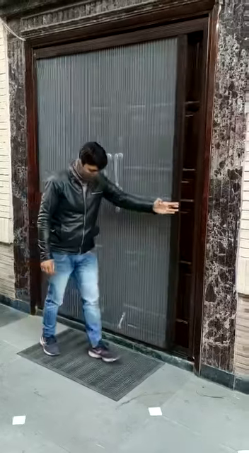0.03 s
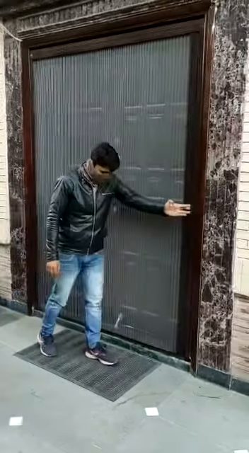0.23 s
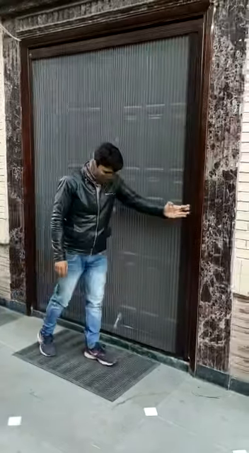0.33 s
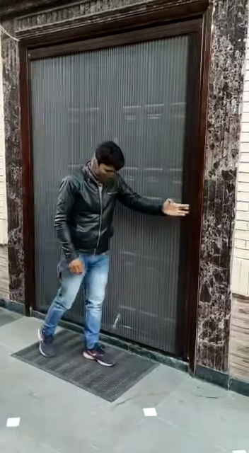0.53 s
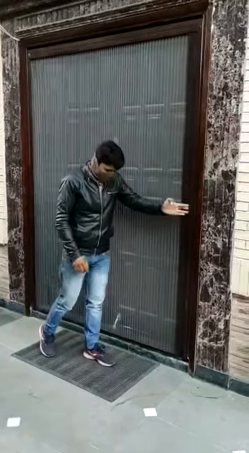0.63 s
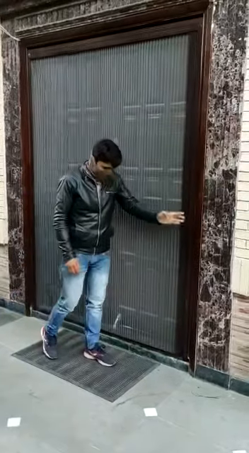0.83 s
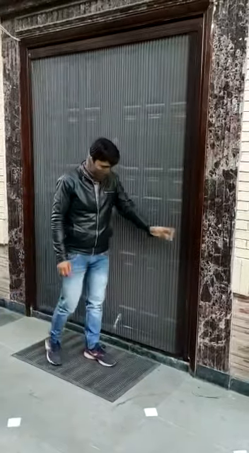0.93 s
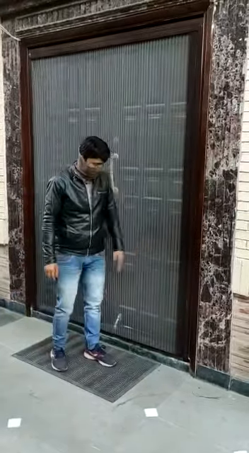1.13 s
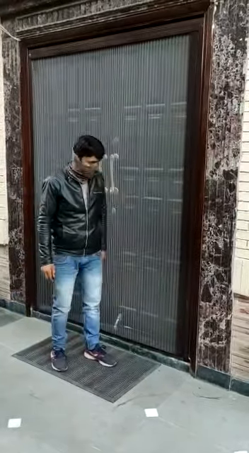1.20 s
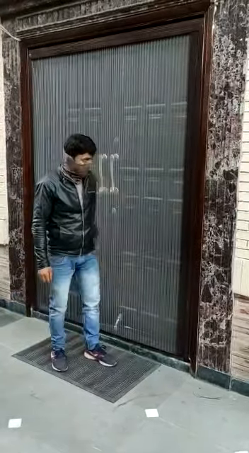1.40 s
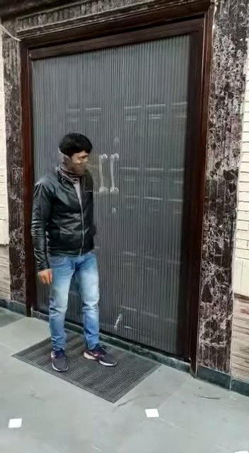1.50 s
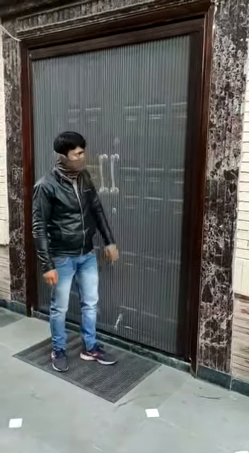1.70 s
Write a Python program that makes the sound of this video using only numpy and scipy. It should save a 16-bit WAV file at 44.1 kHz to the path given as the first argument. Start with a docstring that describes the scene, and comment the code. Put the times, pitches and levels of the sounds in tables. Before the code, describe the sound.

A pleated mesh door rushes softly along its track, then slams into its frame at about 0.25 seconds with a loud, sharp clack that rings in the stone porch for half a second. A jacket swishes faintly around 1 second and again near 1.4, while shoes settle softly on a mat at about 1.3 to 1.4. Low outdoor rumble, faint hiss and a thin electrical whine continue throughout.

```python
"""Mesh door slamming in a porch

A pleated mesh door rushes along its track, where friction excites narrow resonances. Its edge bar
strikes the frame in a quick clatter; the frame rings in damped modes and the stone porch reverberates.
A jacket then swishes as the arm drops and the body turns, and shoes settle softly on the mat.
Low outdoor rumble, faint hiss and a thin electrical whine continue throughout."""
import sys
import numpy as np
from scipy import signal
from scipy.fft import rfft, irfft
from scipy.io import wavfile

SR = 44100
rng = np.random.default_rng(int(sys.argv[2]) if len(sys.argv) > 2 else 0)


def log_audio(samples):
    """Write samples as a 16-bit WAV file to the path given in sys.argv[1]."""
    # one column per channel
    frames = np.atleast_2d(samples).T
    # limit to full scale, then quantise
    limited = np.clip(frames, -1, 1)
    pcm = np.round(limited * 32767).astype(np.int16)
    wavfile.write(sys.argv[1], SR, pcm)


N = 77175
TIME = np.arange(N) / SR
BIN_HZ, PADDED_BIN_HZ = np.fft.rfftfreq(N, 1 / SR), np.fft.rfftfreq(2 * N, 1 / SR)
DOOR_STOP_S = 0.26

# Coherence of the left and right channels: f/Hz, correlation
COHERENCE = [(100, .96), (330, 0.92), (700, 0.68), (1400, 0.0038), (2800, 0.023), (12000, -0.26)]
# Excess of the left channel over the right: f/Hz, level/dB
LEFT_EXCESS = [(100, 1.5), (400, 1.5), (1200, 2.5), (2400, 2), (4400, 4.5), (7000, 10), (9500, 11.5),
               (12000, 5.5), (15000, -1.5)]
# Envelope of the sliding mesh: t/s, level/dB
SLIDE_ENVELOPE = [(0, -43.5), (.04, -42.5), (.08, -44), (.12, -44), (.17, -45.5), (.24, -44.5)]
# Spectrum of pleats and runners rubbing: f/Hz, relative level/dB
SLIDE_SPECTRUM = [(200, -8.5), (600, -12.5), (1150, -5), (1450, -4.5), (2050, 1), (2750, -4), (3400, -3),
                  (4500, -6.5), (6200, -9.5), (10000, -8.5), (12500, -16.5), (16000, -19)]
# Resonances of the track: f/Hz, glide/(Hz/s), bandwidth/Hz, level/dB, peak t/s, spread/s
TRACK_RESONANCES = [(1400, -2000, 100, -51, 0.12, 0.069), (2196, 8, 130, -50.5, 0.1, 0.096),
                    (1900, 2, 130, -43.5, 0.25, 0.11), (3420, -2, 390, -45, 0.112, 0.013)]
# Envelope of the outdoor rumble: t/s, level/dB
RUMBLE_ENVELOPE = [(0, -47.5), (.3, -44), (.65, -46), (.8, -45), (.93, -43.5), (1.05, -46.5), (1.25, -45.5),
                   (1.5, -48), (1.75, -48)]
# Spectra of the outdoor rumble and hiss: f/Hz, relative level/dB
RUMBLE_SPECTRUM = [(15, -6.5), (28, 3.5), (38, 0), (55, 0.5), (80, -7), (120, -9), (200, -19), (400, -24),
                   (1000, -42)]
HISS_SPECTRUM = [(100, 4), (330, -0.5), (600, -3), (1100, -4.5), (2000, -6.5), (3000, -13.5), (4000, -15),
                 (6000, -14), (10000, -20), (13000, -29), (16000, -45)]
# Harmonics of the whine: harmonic number, left level/dB, right level/dB, modulation depth
WHINE_HARMONICS = [(1, -53.5, -54, 0.013), (2, -61.5, -68, 0.28), (3, -68, -70, 0.7),
                   (4, -62.5, -68.5, 0.21), (5, -72.5, -78, 0.37), (6, -71, -79, 0.76)]
# Impacts of the edge bar on the frame: t/s, relative level/dB, low-pass corner f/Hz
BAR_IMPACTS = [(.2396, -14, 15000), (.2421, -1, 9000), (.2453, -8, 4000), (.2496, .5, 13000),
               (.2507, -4, 9000), (.2527, -3, 5000), (.2603, -11, 3000), (.2686, -8, 4000)]
# Spectrum of an impact: f/Hz, relative level/dB
IMPACT_SPECTRUM = [(100, -35), (195, -28), (235, 3), (310, 2), (400, -2), (600, -0.5), (900, -0.5),
                   (1900, 5.5), (3000, -0.5), (3900, -5.5), (6000, -11), (8500, -7.5), (10500, -8.5),
                   (12500, -20.5), (16000, -26)]
# Normal modes of bar and frame: f/Hz, relative level/dB, T60/s
NORMAL_MODES = [(232, -10, .2), (263, -8, .45), (288, -11, .4), (368, 5, .17), (447, -2, .27),
                (662, -6, .15), (864, -6, .24), (962, -9, .25), (1197, -6, .24), (1433, -7, .3),
                (1645, -7, .33), (1819, -6, .3), (1880, -8, .26), (1985, -5, .36), (2111, -8, .32),
                (2146, -7, .28), (2455, -8, .22), (2680, -9, .22), (2822, -11, .2)]
# Spectrum of the porch's reverberation: f/Hz, relative level/dB
PORCH_SPECTRUM = [(70, -11.5), (135, -1.5), (200, -11.5), (245, -1), (310, 1.5), (420, 1), (600, -3.5),
                  (1000, -5), (2000, -2), (3000, -7), (4200, -8), (6500, -10.5), (9500, -11), (12500, -13),
                  (16000, -20.5)]
# Reverberation time of the porch: f/Hz, T60/s
REVERBERATION_TIME = [(120, 1.08), (250, 0.7), (500, .57), (2000, 0.61), (5000, .42), (9000, 0.3),
                      (15000, 0.13)]
# Strokes of the sleeve: onset t/s, attack/s, hold/s, release/s, level/dB, lower f/Hz, upper f/Hz
SLEEVE_STROKES = [(0.941, 0.018, 0.022, 0.078, -52.5, 3040, 8600),
                  (0.956, 0.014, 0.029, 0.073, -50, 1400, 4400), (1.162, .01, .015, 0.045, -57, 1400, 2250),
                  (1.15, .05, 0.072, 0.084, -64, 4000, 13800),
                  (1.401, 0.0031, 0.024, 0.084, -49.5, 4500, 16000),
                  (1.424, 0.032, 0.026, 0.078, -51, 6000, 14000)]
# Shoes settling on the mat: t/s, relative level/dB, centre f/Hz, T60/s
FOOTFALLS = [(1.294, -45, 385, .12), (1.395, -45, 148, .55)]


def from_db(db):
    """The decibel scale: amplitude grows tenfold for every 20 dB."""
    return 10 ** (np.asarray(db) / 20)


def unit_rms(x):
    """Normalisation to unit mean power."""
    return x / np.sqrt(np.mean(x ** 2) + 1e-20)


def at_hz(table, hz):
    """Interpolation of a table along a logarithmic frequency axis."""
    frequencies, values = np.transpose(table)
    return np.interp(np.log(np.maximum(hz, 1)), np.log(frequencies), values)


def drift(rate):
    """Random modulation: straight lines join Gaussian values, `rate` of them a second."""
    knots = rng.standard_normal(2000)
    return np.interp(TIME * rate, np.arange(len(knots)), knots)


def decay(t60, start=0):
    """Exponential damping: from its start, the amplitude falls 60 dB in t60 seconds."""
    return (TIME >= start) * np.exp(-np.log(1000) * np.maximum(TIME - start, 0) / t60)


def colour(x, spectrum):
    """Minimum-phase filtering at unit power gain; folding the cepstrum makes it causal."""
    gain = unit_rms(from_db(at_hz(spectrum, PADDED_BIN_HZ)))
    cepstrum = irfft(np.log(gain))
    cepstrum[1:N] *= 2
    cepstrum[N + 1:] = 0
    return irfft(rfft(x, 2 * N) * np.exp(rfft(cepstrum)))[..., :N]


def diffuse_noise():
    """A diffuse field at two points: white noise, coherent in the bass and barely so in the treble."""
    mid, side = rfft(rng.standard_normal((2, N)))
    coherence = at_hz(COHERENCE, BIN_HZ)
    return irfft(np.sqrt(1 + coherence) * mid + np.sqrt(1 - coherence) * side * [[1], [-1]], N)


def mesh_slide(grain_db=0.9):
    """Friction noise: unfolding pleats and rubbing runners make a rush that dies once the door stops."""
    level_db = np.interp(TIME, *np.transpose(SLIDE_ENVELOPE)) + grain_db * drift(290)
    motion = (TIME < DOOR_STOP_S) + decay(t60=0.2, start=DOOR_STOP_S)
    return colour(diffuse_noise() * from_db(level_db) * motion, SLIDE_SPECTRUM)


def track_resonance():
    """Resonance under random forcing: the runners excite narrow bands that swell and fade."""
    out = 0
    for hz, glide, width_hz, db, peak_s, spread_s in TRACK_RESONANCES:
        rub = np.array([drift(2 * width_hz) + 1j * drift(2 * width_hz) for _ in range(2)])
        pitch_hz = hz + glide * np.minimum(TIME, DOOR_STOP_S)
        tone = np.real(rub * np.exp(2j * np.pi * np.cumsum(pitch_hz) / SR))
        out += from_db(db) * np.exp(-((TIME - peak_s) / spread_s) ** 2) * tone
    return out


def outdoor_air(hiss_db=-52.5):
    """Ambient broadband noise: a slowly swelling rumble and a faint steady hiss."""
    rumble, hiss = [unit_rms(irfft(rfft(diffuse_noise()) * from_db(at_hz(spectrum, BIN_HZ)), N))
                    for spectrum in (RUMBLE_SPECTRUM, HISS_SPECTRUM)]
    rumble_db = np.interp(TIME, *np.transpose(RUMBLE_ENVELOPE))
    return from_db(rumble_db) * rumble + from_db(hiss_db) * hiss


def electrical_whine(pitch_hz=1719.5, waver_hz=1.97, flutter_db=1.5, left_lag_rad=1):
    """A harmonic series whose overtones are roughened by random amplitude and phase modulation."""
    cycles = np.cumsum(pitch_hz + waver_hz * drift(29.9)) / SR
    out = 0
    for harmonic, left_db, right_db, depth in WHINE_HARMONICS:
        modulation = 1 + depth * (drift(310) + 1j * drift(310))
        phase = 2 * np.pi * harmonic * cycles - left_lag_rad * np.array([[1], [0]])
        level_db = np.array([[left_db], [right_db]]) + flutter_db * drift(11.97)
        out += np.sqrt(2) * from_db(level_db) * np.real(modulation * np.exp(1j * phase))
    return out


def contact_forces():
    """Impulsive forcing, one pulse per impact: a softer contact lasts longer and holds less treble."""
    forces = []
    for onset_s, db, corner_hz in BAR_IMPACTS:
        impulse = from_db(db) * (np.arange(N) == int(onset_s * SR))
        pole = np.exp(-2 * np.pi * corner_hz / SR)
        forces.append(signal.lfilter([1 - pole], [1, -pole], impulse + 1e-18))
    return np.array(forces)


def bar_clatter(forces, t60=0.029):
    """Convolution: each impact excites its own dense, quickly damped vibration of the bar."""
    envelope = unit_rms(decay(t60)) / np.sqrt(N)  # unit energy
    return sum(signal.fftconvolve(force[None], diffuse_noise() * envelope, axes=1)[:, :N]
               for force in forces)


def summed_envelope(forces, response):
    """Incoherent addition: the energies left by all impacts add, and amplitude is the square root."""
    energy = signal.fftconvolve(np.sum(forces ** 2, axis=0), response ** 2)[:N]
    return np.sqrt(np.abs(energy))


def frame_ring(forces, gain_db=-24.5, rise_s=0.012):
    """Damped normal modes of bar and frame; the high ones differ in phase between the channels."""
    out = 0
    for hz, db, t60 in NORMAL_MODES:
        offset_rad = np.arccos(at_hz(COHERENCE, hz)) / 2 * rng.choice([-1, 1])
        tone = np.sin(2 * np.pi * (hz * TIME + rng.random()) + offset_rad * np.array([[1], [-1]]))
        envelope = summed_envelope(forces, decay(t60) * (1 - decay(rise_s)))
        out += from_db(gain_db + db) * envelope * tone
    return out


def porch_reverberation(forces, gain_db=-26, build_s=0.0021):
    """Reverberation: dense reflections from the stone build up and die away, the treble first."""
    noise_spectrum = rfft(diffuse_noise())
    edges_hz = np.geomspace(40, 20000, 19)
    tail = 0
    for low, high in zip(edges_hz, edges_hz[1:]):
        band = irfft(noise_spectrum * (BIN_HZ >= low) * (BIN_HZ < high), N)
        t60 = at_hz(REVERBERATION_TIME, np.sqrt(low * high))
        response = decay(t60) * (1 - np.exp(-TIME / build_s))
        tail += band * summed_envelope(forces, response)
    return from_db(gain_db) * colour(tail, PORCH_SPECTRUM)


def door_slam(crack_db=1.5, clatter_db=8.5):
    """Impact sound: the same forces drive a crack, the bar's clatter, the frame and the porch."""
    forces = contact_forces()
    direct = from_db(crack_db) * forces.sum(axis=0) + from_db(clatter_db) * bar_clatter(forces)
    return colour(direct, IMPACT_SPECTRUM) + frame_ring(forces) + porch_reverberation(forces)


def jacket_swish(grain_db=2):
    """Friction of cloth: each stroke of sleeve against body gives a grainy band of noise."""
    out = 0
    for onset_s, attack, hold, release, db, low_hz, high_hz in SLEEVE_STROKES:
        band = signal.butter(2, [low_hz, high_hz], "band", fs=SR, output="sos")
        friction = diffuse_noise() * from_db(grain_db * drift(300))
        envelope = np.interp(TIME, np.cumsum([onset_s, attack, hold, release]), [0, 1, 1, 0])
        out += from_db(db) * unit_rms(signal.sosfilt(band, friction)) * envelope
    return out


def footfalls(gain_db=-3, edge_ratio=1.088, rise_s=0.044):
    """Cushioned impact: shoes settling on the mat give low, narrow-band thuds with a soft onset."""
    out = 0
    for onset_s, db, hz, t60 in FOOTFALLS:
        band = signal.butter(1, [hz / edge_ratio, hz * edge_ratio], "band", fs=SR, output="sos")
        thud = unit_rms(signal.sosfilt(band, signal.sosfilt(band, diffuse_noise())))
        envelope = decay(t60, onset_s) * (1 - decay(rise_s, onset_s))
        out += from_db(gain_db + db) * thud * envelope
    return out


def scene():
    """Superposition: a level difference draws the treble to the left; the whine has its own balance."""
    sources = mesh_slide() + track_resonance() + door_slam() + jacket_swish() + footfalls() + outdoor_air()
    balance_db = at_hz(LEFT_EXCESS, PADDED_BIN_HZ) * np.array([[.5], [-.5]])
    panned = irfft(rfft(sources, 2 * N) * from_db(balance_db))[:, :N]
    return panned + electrical_whine()


def record(dry, ceiling=0.75, cutoff_hz=15800):
    """Soft saturation rounds the highest peaks, and a steep low-pass filter limits the bandwidth."""
    rounded = dry / (1 + (dry / ceiling) ** 4) ** (1 / 4)
    low_pass = signal.ellip(10, .1, 80, cutoff_hz, fs=SR, output="sos")
    return signal.sosfilt(low_pass, rounded)


dry = scene()
out = record(dry)
log_audio(out)
```